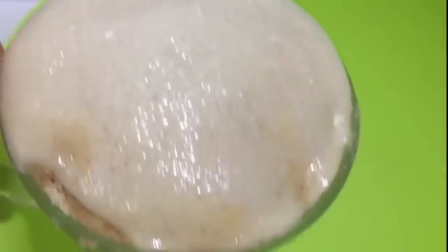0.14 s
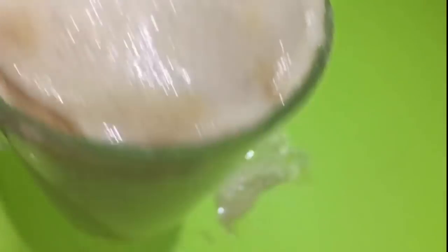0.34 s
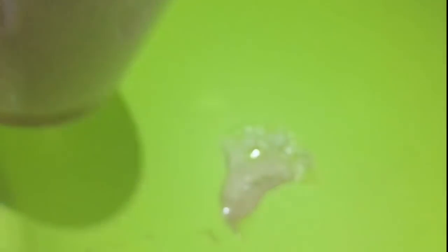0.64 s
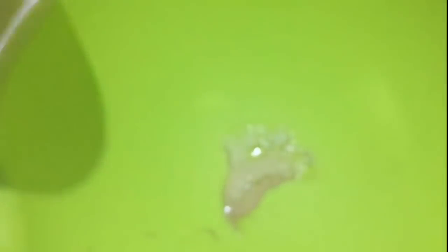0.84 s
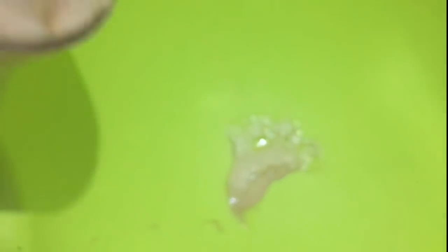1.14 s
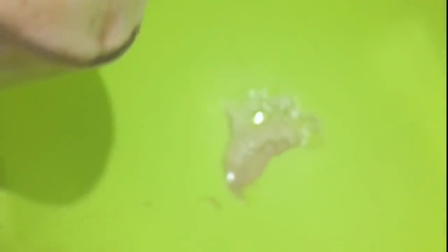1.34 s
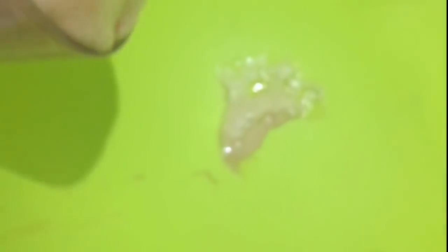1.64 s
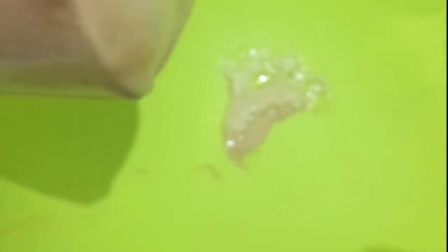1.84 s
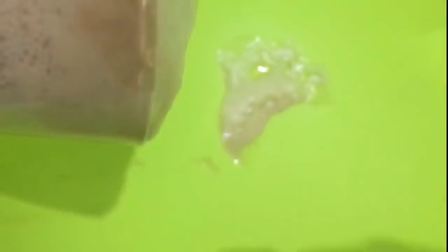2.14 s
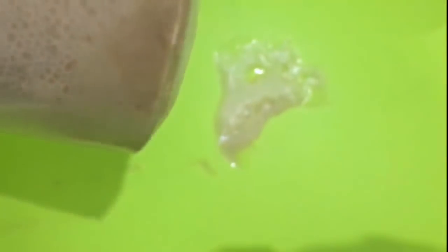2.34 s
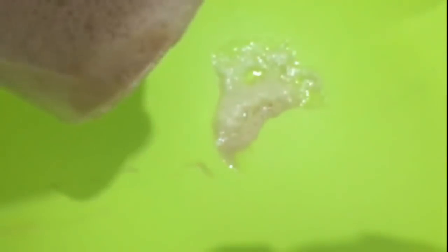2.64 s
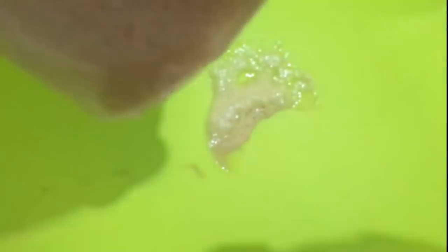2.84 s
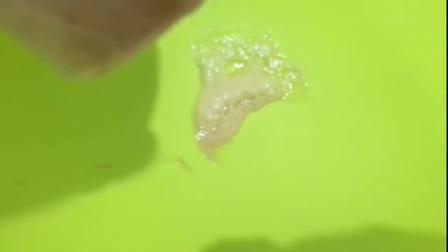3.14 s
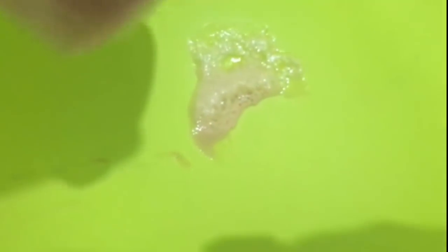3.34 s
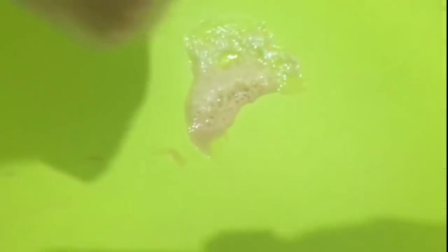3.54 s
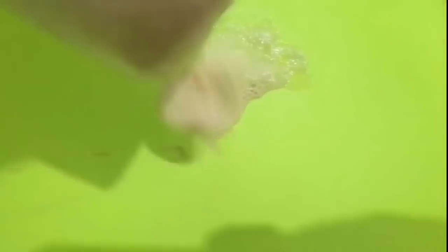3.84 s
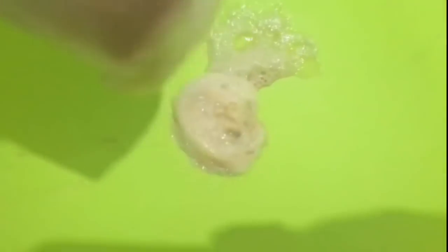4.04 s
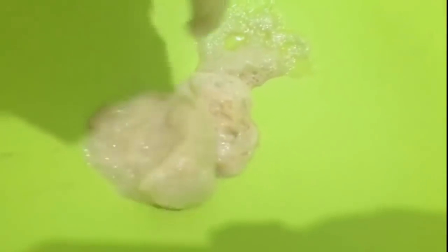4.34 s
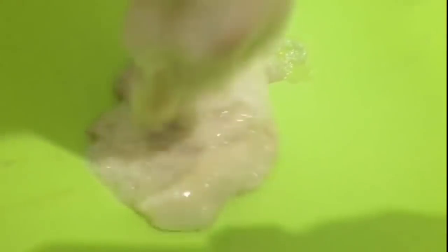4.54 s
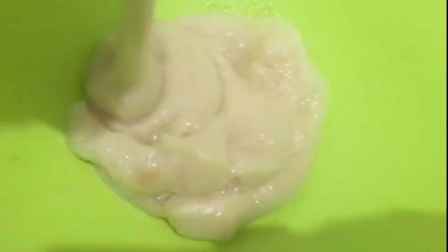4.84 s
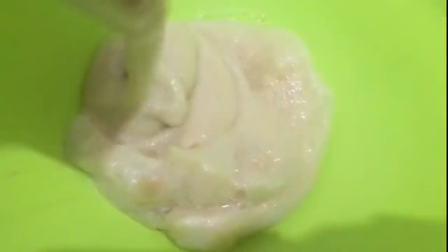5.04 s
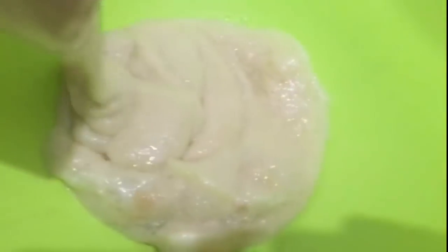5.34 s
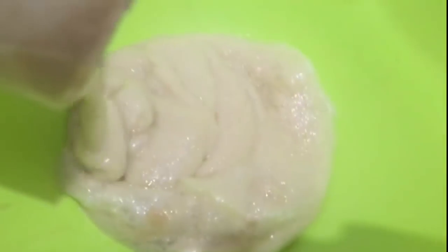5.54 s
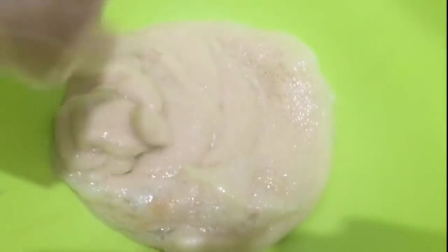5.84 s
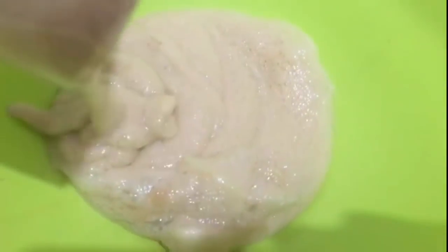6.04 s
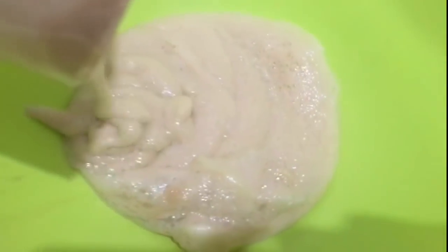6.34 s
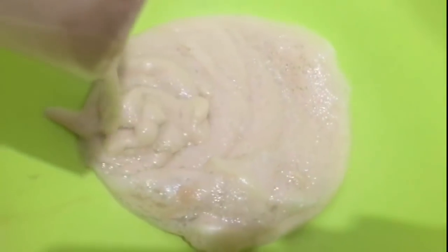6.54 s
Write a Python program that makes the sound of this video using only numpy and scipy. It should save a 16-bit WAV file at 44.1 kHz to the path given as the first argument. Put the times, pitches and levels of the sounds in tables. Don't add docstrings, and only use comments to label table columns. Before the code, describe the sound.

Close small microphone by a plastic bowl on a worktop, with steady motor rumble and soft air noise. One sharp plastic knock stands out, then a dull thud. A gripped glass ticks and clinks irregularly with low handling bumps. Then thick froth lands in two wet slaps, the second harder, with brief crackling fizz, dull bumps, drips and tiny pops fading into the hum.

```python
import sys
import numpy as np
from scipy import signal
from scipy.fft import rfft, irfft, next_fast_len
from scipy.io import wavfile

SR = 44100
rng = np.random.default_rng(int(sys.argv[2]) if len(sys.argv) > 2 else 0)


def attenuation_scalar(level_db):
    decades = np.asarray(level_db, float) / 20
    return 10 ** decades


def store_wav(level_fs):
    pcm = np.round(np.clip(np.atleast_2d(level_fs), -1, 1) * 32767)
    wavfile.write(sys.argv[1], SR, pcm.T.astype(np.int16))


N = 294357
TIME = np.arange(N) / SR


def noise():
    return rng.standard_normal(N)


def rms_one(x):
    return x / np.sqrt(np.mean(x ** 2) + 1e-20)


def gated(rows):
    s, db = np.transpose(rows)[:2]
    s = np.r_[s[0] - 0.02, s, s[-1] + 0.02]
    return attenuation_scalar(np.interp(TIME, s, np.r_[-110, db, -110]))


def swells(rows):
    total = np.zeros(N)
    for s, db, rise, fall in rows:
        total += attenuation_scalar(np.interp(TIME, [s - 3 * rise, s, s + 3 * fall], [db - 60, db, db - 60]))
    return total


def coloured(x, spectrum):
    hz, db = np.transpose(spectrum)
    size = next_fast_len(N)
    grid = np.maximum(np.arange(size // 2 + 1) * SR / size, 1)
    gain = attenuation_scalar(np.interp(np.log(grid), np.log(hz), db, left=-90))
    return rms_one(irfft(rfft(x, size) * gain, size)[:N])


def ring(drive, hz, t60):
    r, w = attenuation_scalar(-60 / (t60 * SR)), 2 * np.pi * hz / SR
    return signal.lfilter([0, np.sin(w)], [1, -2 * r * np.cos(w), r * r], drive + 1e-18)


def clicks(seconds, db):
    out = np.zeros(N)
    out[(np.asarray(seconds) * SR).astype(int)] = attenuation_scalar(np.asarray(db))
    return out


def dying(train, t60):
    return signal.lfilter([1], [1, -attenuation_scalar(-60 / (t60 * SR))], train + 1e-18)


def soft(x, hz):
    r = np.exp(-2 * np.pi * hz / SR)
    return signal.lfilter([(1 - r) ** 2], [1, -2 * r, r * r], x)


def passed(x, low_hz, high_hz):
    return signal.sosfilt(signal.butter(2, [low_hz, high_hz], "band", fs=SR, output="sos"), x)


def high_passed(x, order, hz):
    return signal.sosfilt(signal.butter(order, hz, "high", fs=SR, output="sos"), x)


# (frequency [Hz], level [dB per Hz])
RUMBLE_COLOUR = [(22, -18), (40, 2), (64, 2), (119, 1), (165, 1.5), (200, -5), (240, -2), (310, -5),
                 (402, -15), (450, -43.5), (600, -31.5), (780, -54)]
# (frequency [Hz], level [dB per Hz])
AIR_COLOUR = [(240, -27), (400, 2), (476, -5.5), (828, -9.5), (917, -4), (1120, -7.5), (1280, -11),
              (1570, -14.5), (2190, -18.5), (4410, -25.5), (4960, -32), (5570, -28.5), (11200, -27.5),
              (11900, -27), (13000, -59), (16800, -91), (22000, -120)]
# (frequency [Hz], width [Hz], level [dB])
MOTOR_TONES = [(47.4, 4, -59.5), (69.55, 5.3, -54), (149.4, 7.8, -57.5), (190.9, 9.3, -48.5),
               (229.5, 4.9, -61), (905, 9, -76), (955, 8.6, -73.5), (1048, 9, -71), (1096, 10, -76)]
# (time [s], level [dB])
MOTOR_LOAD = [(0, -0.5), (1.0, -2.5), (1.6, 1), (2.2, 1), (3.6, 0), (5.0, 1), (5.3, -1.5), (5.8, 1.5),
              (6.67, 0.5)]
# (time [s], level [dB], rise [s], fall [s])
NEAR_AIR = [
    (3.8, -67, 2.5, 2.0),
]


def room_tone():
    load_db = np.interp(TIME, *np.transpose(MOTOR_LOAD))
    whine = attenuation_scalar(np.interp(TIME, [0, 2.3], [-8, 0]))
    rumble = attenuation_scalar(-3.5) * coloured(noise(), RUMBLE_COLOUR)
    tones = np.zeros(N)
    for hz, width, db in MOTOR_TONES:
        t60 = np.log(1000) / (np.pi * width)
        started = ring(rng.standard_normal(N + SR), hz, t60)
        noisy = rms_one(ring(started, hz, t60)[SR:])
        noisy = rms_one(noisy / (np.abs(signal.hilbert(noisy)) + 0.2) ** 0.7)
        steady = np.sqrt(2) * np.sin(2 * np.pi * (hz * TIME + rng.random()))
        tones += (whine if hz > 500 else 1) * attenuation_scalar(db) * (1.1 * noisy + 0.37 * steady)
    air = attenuation_scalar(2) * np.hypot(attenuation_scalar(-63.8), swells(NEAR_AIR)) * coloured(noise(), AIR_COLOUR)
    return attenuation_scalar(-46 + 0.27 * load_db) * rumble + attenuation_scalar(load_db) * tones + air


# (frequency [Hz], level [dB per Hz])
FROTH_COLOUR = [(290, -23), (500, -4.5), (630, -4), (794, -36), (1060, -6), (1260, -5), (1920, -17.5),
                (2670, -10.5), (4020, -15), (4790, -22.5), (6210, -19), (11100, -21), (12100, -17.5),
                (13000, -59), (16800, -89), (22000, -120)]
# (time [s], level [dB])
FLOW = [(3.83, -76), (3.91, -66.5), (3.98, -83), (4.06, -64), (4.14, -82), (4.185, -64.5), (4.257, -71),
        (4.405, -58), (4.477, -80), (4.515, -59.5), (4.64, -60), (4.70, -63), (4.79, -61), (4.96, -65),
        (5.09, -69), (5.3, -66.5), (5.65, -73.5), (6.67, -82)]
# (time [s], level [dB], rise [s], fall [s])
LATE_SLIDES = [
    (5.84, -74, 0.036, 0.088),
    (6.083, -70, 0.022, 0.042),
]
# (time [s], level [dB], rise [s], fall [s])
SPLASHES = [
    (5.122, -60, .008, .06),
    (4.53, -62, .03, .06),
    (4.80, -62, .04, .04),
]
# (low [Hz], high [Hz])
SPLASH_BAND = (3400, 4500)
# (time [s], level [dB])
BUBBLE_POPS = [
    (0.4863, -61),
    (0.7297, -61),
    (1.1194, -61),
               (5.1113, -52), (5.2235, -53), (5.2555, -50), (5.2969, -52), (5.4046, -55), (5.5134, -55),
        (5.5508, -53), (5.7997, -56), (5.8471, -55), (5.9095, -56), (6.0821, -51), (6.1325, -58),
        (6.2492, -58), (6.4976, -57)]


def froth():
    mean_flow_db = -63.5
    flow = gated(FLOW) + swells(LATE_SLIDES)
    sizes = attenuation_scalar(3 * np.minimum(rng.exponential(1, N), 3)) * rng.choice([-1, 1], N)
    bursts = (rng.random(N) < 6000 / SR) * sizes
    fizz = coloured(rms_one(bursts) + 0.41 * noise(), FROTH_COLOUR)
    shared = rms_one(soft(noise(), 45))

    body = np.zeros(N)
    edges = np.geomspace(500, 5600, 8)
    for k, (low_hz, high_hz) in enumerate(zip(edges, edges[1:])):
        patch = attenuation_scalar(1.5 * shared + 2.6 * rms_one(soft(noise(), 12)))
        body += patch * passed(np.roll(fizz, 100 * k), low_hz, high_hz)
    body = rms_one(body) * attenuation_scalar(-62.5) * (flow / attenuation_scalar(mean_flow_db)) ** 1.5

    fine = passed(passed(fizz, 4150, 15000), 4150, 15000)
    hiss = np.zeros(N)
    edges = np.geomspace(3500, 13000, 7)
    for k, (low_hz, high_hz) in enumerate(zip(edges, edges[1:])):
        patch = attenuation_scalar(1.8 * rms_one(soft(noise(), 8)) - 0.5 * k)
        hiss += patch * passed(np.roll(fine, 100 * k), low_hz, high_hz)
    hiss = attenuation_scalar(-1.5) * rms_one(attenuation_scalar(1.5 * shared) * hiss) * flow

    splash = swells(SPLASHES) * rms_one(attenuation_scalar(3 * shared) * passed(fizz, *SPLASH_BAND))
    gurgle = attenuation_scalar(-68 - mean_flow_db) * flow * rms_one(attenuation_scalar(3 * shared) * passed(bursts, 300, 800))
    lone = dying(clicks(*np.transpose(BUBBLE_POPS)), 0.008) * noise()
    return body + hiss + splash + gurgle + attenuation_scalar(-3) * passed(lone, 4000, 11500)


# (time [s], level [dB])
KNOCK = (1.4265, -9.5)
# (frequency [Hz], level [dB], t60 [s])
KNOCK_MODES = [(1056, -5.5, 0.02), (1270, 3, 0.0094), (1560, 1.5, 0.015), (2100, -11.5, 0.016),
               (2550, -7, 0.0082), (3060, -15, 0.018), (3500, -22.5, 0.0074), (6040, -25.5, 0.0042),
               (6700, -27, 0.0047)]


def knock():
    s, db = KNOCK
    blow = soft(clicks([s - 0.0009, s], [db - 11.5, db]), 9900)
    direct = np.zeros(N)
    for k, (hz, level, t60) in enumerate(KNOCK_MODES):
        direct -= attenuation_scalar(level - 2) * ring(blow, hz, t60) * (-1) ** k
    direct = high_passed(direct, 3, 1000)
    age = TIME - s
    echo = attenuation_scalar(db - 28.5) * (age > 0.006) * np.exp(-(np.abs(age) / 0.048) ** 1.3) * noise()
    low_echo = passed(passed(echo, 930, 1900), 930, 1900)
    high_echo = passed(passed(echo, 2200, 3200), 2200, 3200)
    worktop = ring(soft(clicks([s + 0.0035], [db - 15.5]), 370), 190, 0.069)
    return direct + attenuation_scalar(7.5) * (low_echo + attenuation_scalar(-12) * high_echo) + worktop


# (time [s], level [dB], pitch [Hz], t60 [s])
BUMPS = [(2.048, -21.5, 503, 0.015), (2.0472, -39.5, 820, .009), (2.062, -55, 580, .13),
         (3.652, -57, 560, .04), (4.180, -52, 560, .025), (4.517, -49, 494, 0.032), (5.112, -50, 900, .017),
         (5.2977, -43, 480, .016), (5.2972, -42.5, 1030, 0.043), (5.3984, -40.5, 320, 0.045),
         (5.3982, -43, 603, .028)]
# (time [s], level [dB], pitch [Hz], click level [dB])
WET_TICKS = [
    (2.0475, -55.5, 2600, -8),
    (2.09, -56, 2250, -10),
    (2.101, -61.5, 2800, -6),
    (5.1118, -45.5, 1730, -3),
    (5.111, -49, 3600, -6),
    (5.2975, -53, 1780, -8),
    (5.399, -53, 1560, -6),
    (5.511, -66, 2500, 1),
    (5.551, -63, 2600, -8),
    (5.848, -72, 3400, 6),
]


def taps():
    out, white = np.zeros(N), noise()
    dull = [(s, db, hz, t60, -32 if s < 2.5 else -15) for s, db, hz, t60 in BUMPS]
    wet = [(s, db, hz, 32 / hz, click_db) for s, db, hz, click_db in WET_TICKS]
    for s, db, hz, t60, click_db in dull + wet:
        span = slice(int(s * SR), int(s * SR) + SR // 2)
        push = soft(clicks([s], [db + 11])[span], 1.1 * hz)
        out[span] += ring(push, hz, t60) - 0.5 * ring(push, 1.31 * hz, 0.5 * t60)
        click = dying(clicks([s], [db + click_db + 6])[span], 0.015)
        tail = dying(clicks([s], [db + click_db - 4.5])[span], 0.15)
        out[span] += passed((click + tail) * white[span], 0.5 * hz, min(2.54 * hz, 5500))
    return out


# (frequency [Hz], level [dB], t60 [s])
GLASS_MODES = [(2120, -6, 0.025), (2303, 0, 0.042), (3390, -9, 0.031), (4560, -10, 0.022),
               (5530, -7.5, 0.027), (6470, -3, 0.019), (7340, -5.5, 0.018), (9270, -6.5, 0.019),
               (11560, -13, 0.011)]
# (time [s], level [dB], rise [s], fall [s])
BRUSHES = [
    (2.09, -69, 0.055, .05),
    (2.17, -58.5, .045, .035),
    (2.41, -66, .03, 0.22),
]
# (time [s], level [dB], rise [s], fall [s])
SQUEAKS = [
    (2.162, -71, .055, .28),
    (2.404, -79, .09, .2),
    (2.58, -68, 0.044, 1.0),
    (2.86, -70, .8, 0.027),
    (2.994, -70, 0.055, .035),
]
# (time [s], level [dB], rise [s], fall [s])
HANDLING = [
    (2.63, -39.5, 0.099, 0.56),
    (2.986, -43, 0.033, 0.079),
    (3.258, -41.5, 0.099, .08),
    (3.454, -41.5, 0.085, 0.057),
    (3.55, -47, .1, .6),
    (3.818, -44, .07, 0.09),
    (4.1, -51, 0.43, 0.065),
]


def hands():
    rub = swells(BRUSHES) * noise()
    stick_slip = noise() * attenuation_scalar(6.9 * rms_one(soft(noise(), 60)))
    woken = attenuation_scalar(-8) * swells(SQUEAKS) * rms_one(ring(stick_slip, 7380, 0.047))
    near_rim = np.abs(TIME - 2.43) < 0.045
    woken += attenuation_scalar(-25) * ring(rub * near_rim, 10800, 0.04)
    for hz, db, t60 in GLASS_MODES:
        woken += attenuation_scalar(db - 35) * ring(rub, hz, t60)
    shake = attenuation_scalar(0.5) * swells(HANDLING) * rms_one(passed(noise(), 49, 166))
    return attenuation_scalar(3) * passed(rub, 5600, 9700) + woken + shake


# (time [s], crack level [dB], first mode level [dB], second mode level [dB])
SLIPS = [(2.1984, -61, -73, -57), (2.2054, -56, -72, -59), (2.368, -65, -75, -61), (2.5697, -53, -72, -70),
         (2.6806, -48, -64, -52), (2.7058, -44.5, -46, -61), (2.8588, -36.5, -63, -47),
         (2.985, -36.5, -37, -45), (2.9902, -43, -29.5, -57), (3.0025, -49, -68, -75),
         (3.25, -38.5, -32, -50), (3.4328, -42, -47, -53), (3.5104, -39.5, -61, -43),
         (3.5867, -45, -32, -38.5), (3.5994, -41, -59, -46), (3.6142, -50, -68, -50),
         (3.691, -46.5, -53, -48.5), (3.706, -50, -70, -57), (3.8046, -34.5, -41, -39.5),
         (3.9923, -47.5, -64, -46.5), (4.0972, -36.5, -59, -42.5), (4.3833, -46.5, -65, -64),
         (4.573, -45, -65, -45.5)]
# (time [s], crack level [dB], first mode level [dB], second mode level [dB])
STUTTERS = [
    (2.738, -44, -56, -53),
    (2.7749, -41.5, -44, -55),
    (2.805, -39, -44, -54),
    (2.9633, -39, -39, -48),
]
# (time [s], level [dB], frequency [Hz])
SINGS = [(2.7754, -42, 6470), (2.7858, -49, 7340), (2.7053, -50, 6470), (2.805, -48, 5900),
         (2.8584, -26.5, 7340), (2.99, -38, 4560), (3.251, -25.5, 4560), (3.5106, -39, 5530),
         (3.5865, -35, 6470), (3.6144, -48, 4560), (3.8047, -43, 7340), (4.0972, -37, 7340)]


def glass():
    chatter = [(2.5893 + 0.0145 * k, -50 + 0.8 * (k - 3), -56.5, -56.5) for k in range(6)]
    rebounds = np.array(STUTTERS) + [0.011, -15, -15, -15]
    slips = np.vstack([chatter, STUTTERS, rebounds, SLIPS])
    s, crack_db, first_db, second_db = np.transpose(slips)

    uneven = rng.normal(0, 3, (len(s), len(GLASS_MODES)))
    drives = [first_db, second_db]
    drives += [crack_db - 9 + uneven[:, k] for k in range(2, len(GLASS_MODES))]
    out = np.zeros(N)
    for drive, (hz, db, t60) in zip(drives, GLASS_MODES):
        out += ring(clicks(s, drive + db), hz, t60)

    chatter_sings = [(row[0], -57, GLASS_MODES[k][0]) for row in chatter for k in (3, 5)]
    for at, db, hz in SINGS + chatter_sings:
        span = slice(int(at * SR), int(at * SR) + SR // 2)
        out[span] += ring(clicks([at], [db - 12])[span], hz, 0.027)

    out += ring(clicks(s, second_db - 6), 2800, 0.009)
    white = noise()
    out += passed(dying(clicks(s, crack_db - 1.5), 0.015) * white, 690, 8500)
    jolts = clicks(s, crack_db + 3.5 - 10 * (s > 3.47))
    bowl = ring(soft(jolts, 1200), 319, 0.02)
    worktop = attenuation_scalar(-4) * ring(soft(jolts, 500), 140, 0.04)
    rattle = attenuation_scalar(5) * passed(dying(jolts, 0.016) * white, 300, 1490)
    return out + bowl + worktop + rattle


# (time [s], level [dB], length [s], low slap level [dB])
BLOBS = [
    (4.036, -35.5, 0.014, -3.5),
    (4.0522, -37.5, 0.0023, -25),
    (4.62, -27.5, 0.0052, -8.5),
]
# (frequency [Hz], level [dB per Hz])
BLOB_COLOURS = [
    [(240, -37), (400, -0.5), (878, -10), (1140, 0.5), (1840, -2.5), (5900, -10), (6440, -13),
     (11200, -8.5), (13000, -13), (16800, -60), (22000, -120)],
    [(300, -30), (600, -16), (1050, -1.5), (1500, -15), (2200, -9), (3200, -5.5), (4100, -3.5),
     (5200, -17.5), (6200, -9), (8000, -16), (11400, -17), (13000, -30)],
]


def splats():
    out = np.zeros(N)
    grains = noise() * attenuation_scalar(4 * noise())
    wet, hard = [coloured(grains, colour) for colour in BLOB_COLOURS]
    for (s, db, length, slap_db), crackle in zip(BLOBS, (wet, wet, hard)):
        age = np.maximum(TIME - s, 0)
        burst = np.exp(-(age / length) ** 3)
        burst += 0.8 * np.exp(-age / 0.0012) + 0.064 * np.exp(-age / 0.017)
        push = soft(clicks([s + 0.001], [db + slap_db + 2]), 1700)
        out += attenuation_scalar(db) * (TIME > s) * burst * crackle
        out += ring(push, 644, 0.05) + ring(push, 1060, 0.028)
    return out


def scene():
    return (room_tone() + froth() + knock() + taps() + hands() + glass() + splats())[None]


def low_pass(x):
    return signal.sosfilt(signal.butter(12, 13100, fs=SR, output="sos"), x)


def record(dry):
    cut = high_passed(dry, 5, 38)
    treble_cut = signal.ellip(6, 0.5, 28, 11700, fs=SR, output="sos")
    mix = signal.sosfilt(treble_cut, cut)
    return low_pass(mix)


dry = scene()
out = record(dry)
store_wav(out)
```